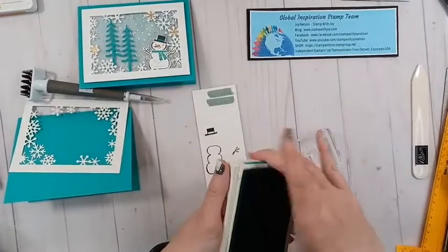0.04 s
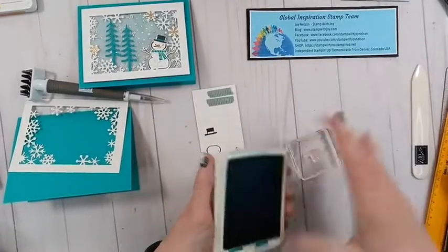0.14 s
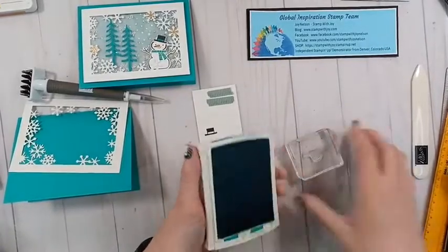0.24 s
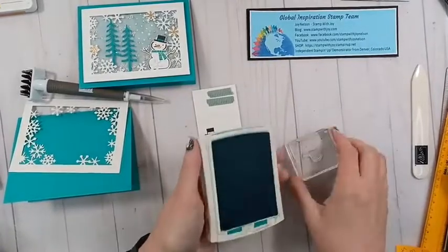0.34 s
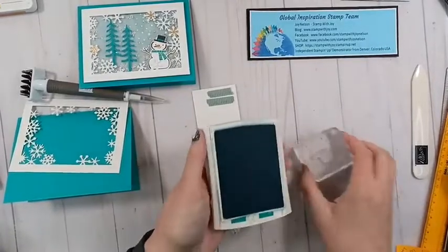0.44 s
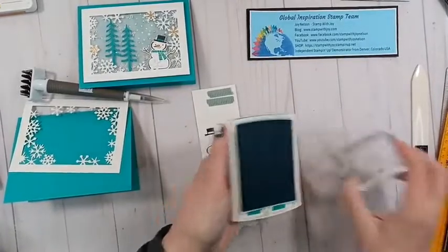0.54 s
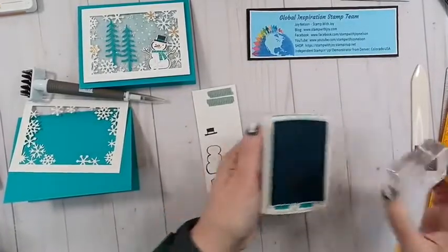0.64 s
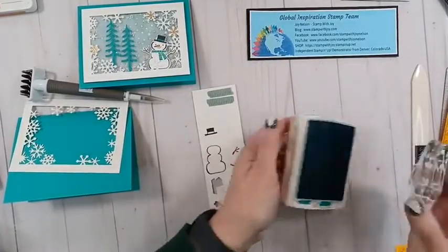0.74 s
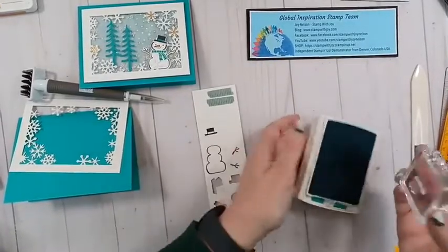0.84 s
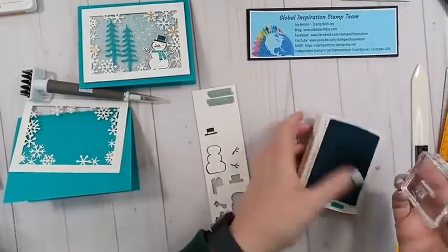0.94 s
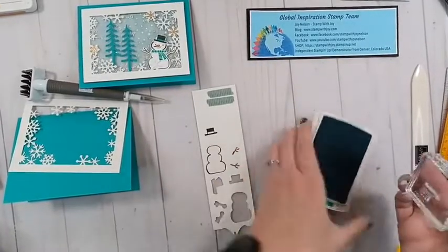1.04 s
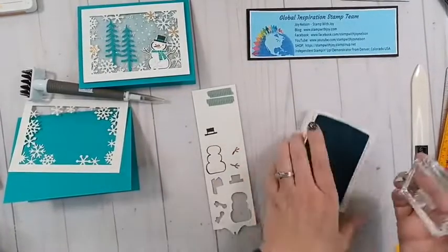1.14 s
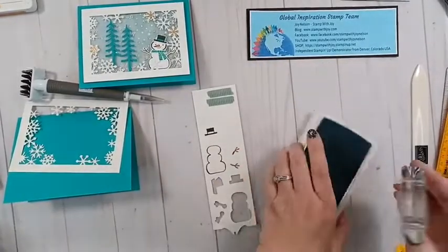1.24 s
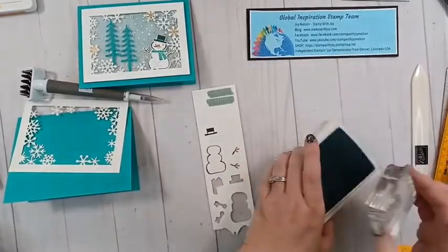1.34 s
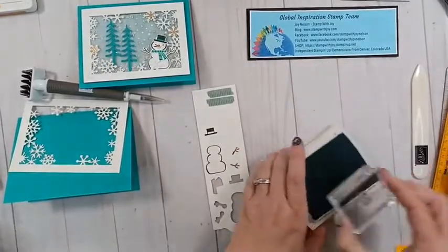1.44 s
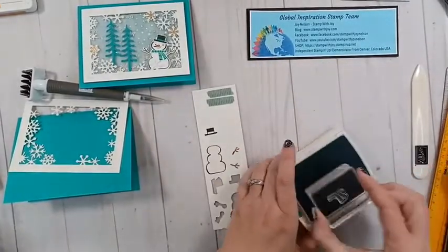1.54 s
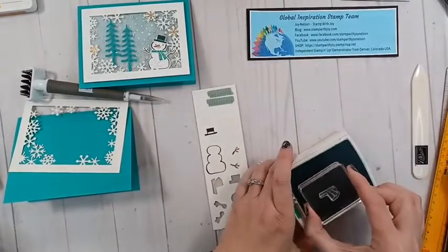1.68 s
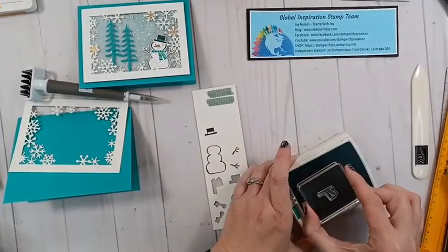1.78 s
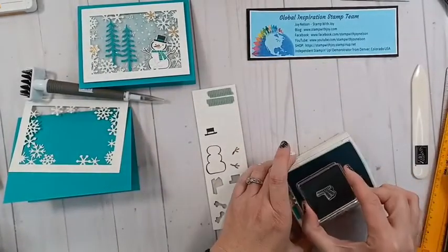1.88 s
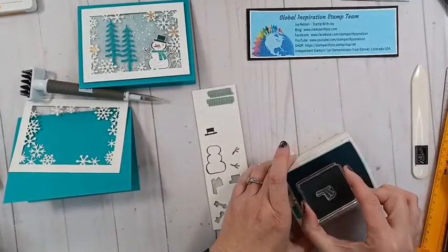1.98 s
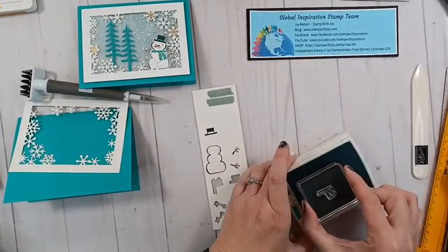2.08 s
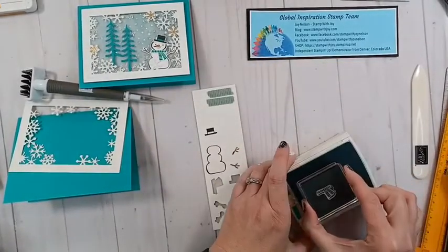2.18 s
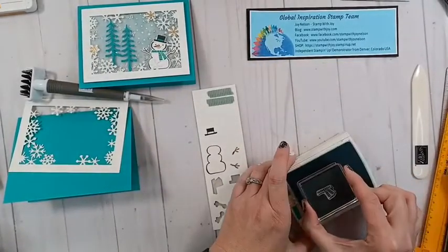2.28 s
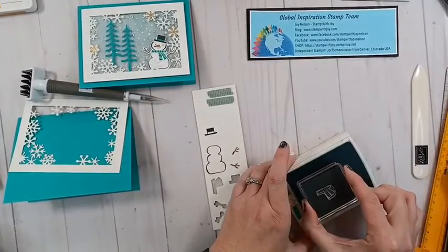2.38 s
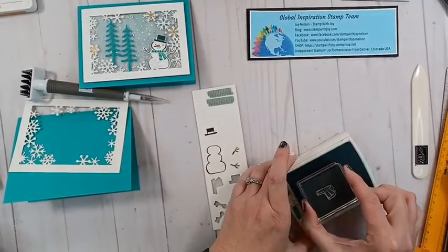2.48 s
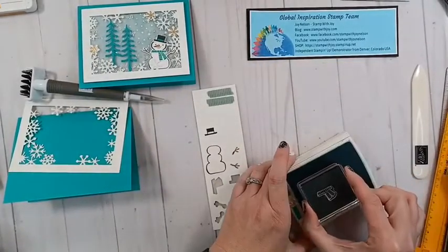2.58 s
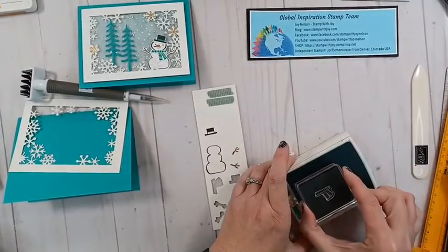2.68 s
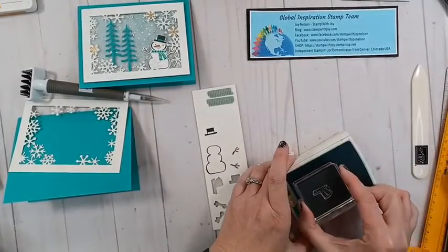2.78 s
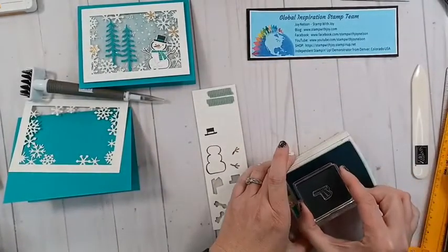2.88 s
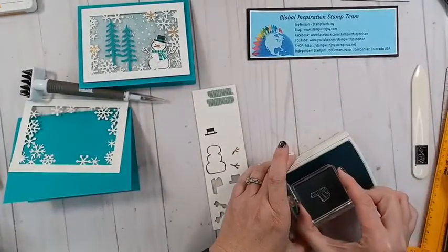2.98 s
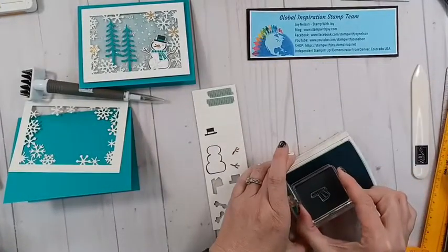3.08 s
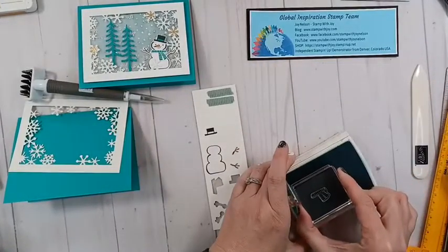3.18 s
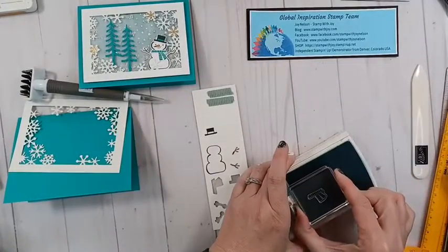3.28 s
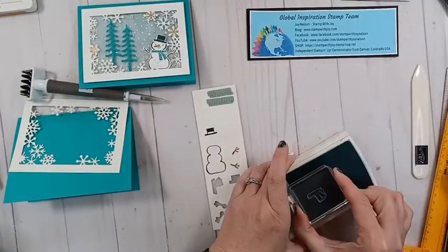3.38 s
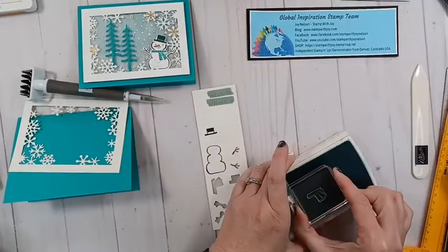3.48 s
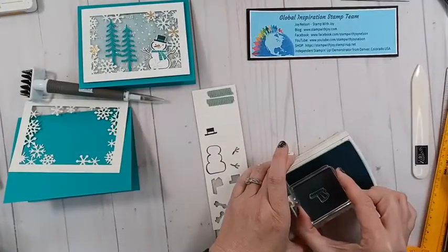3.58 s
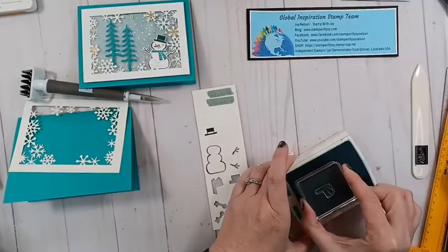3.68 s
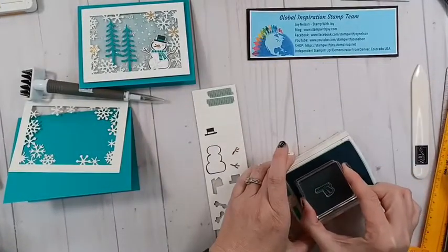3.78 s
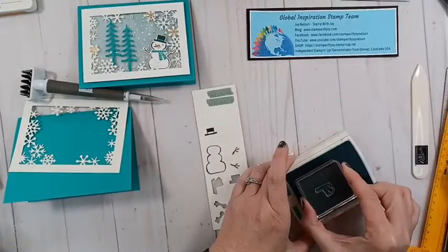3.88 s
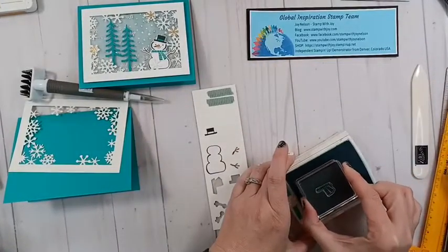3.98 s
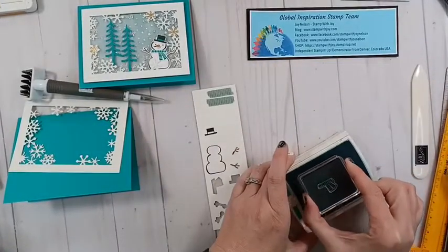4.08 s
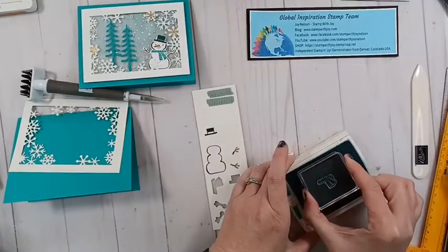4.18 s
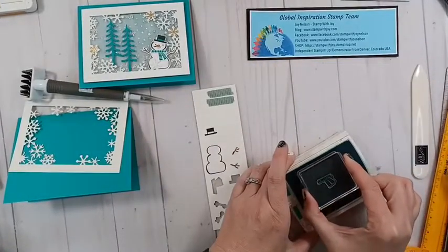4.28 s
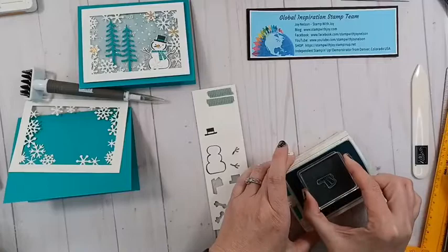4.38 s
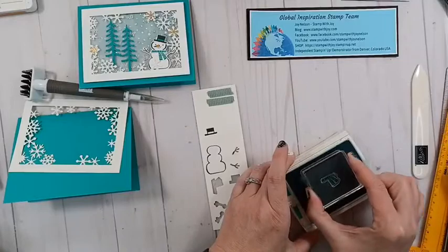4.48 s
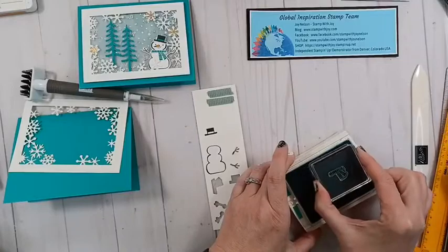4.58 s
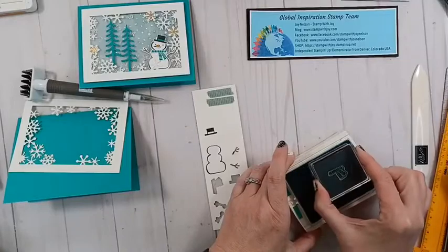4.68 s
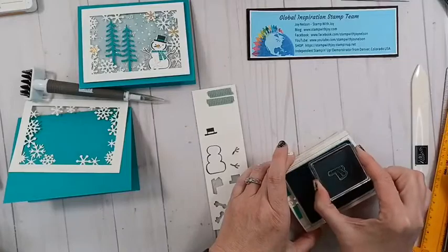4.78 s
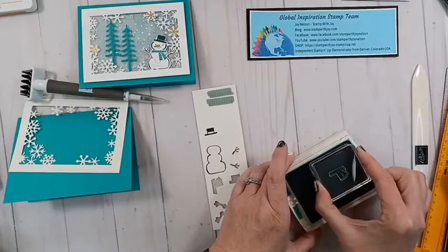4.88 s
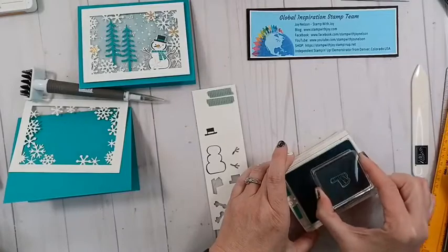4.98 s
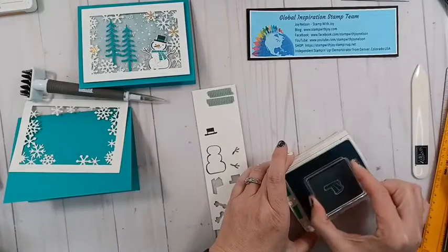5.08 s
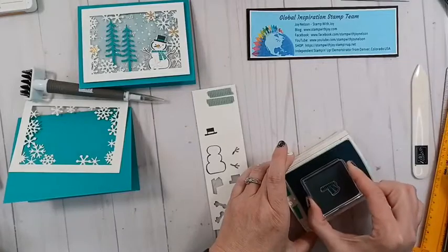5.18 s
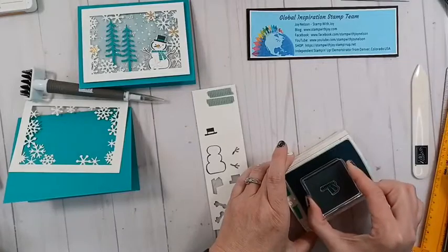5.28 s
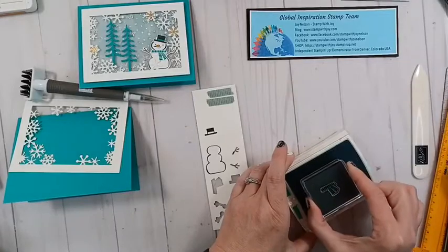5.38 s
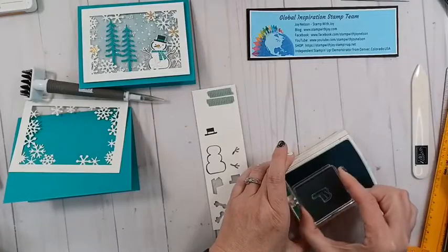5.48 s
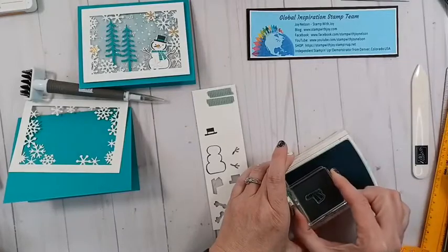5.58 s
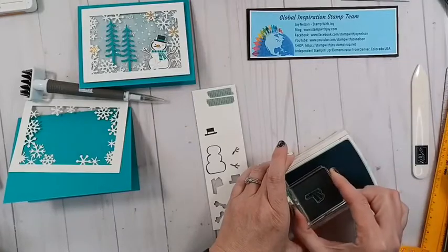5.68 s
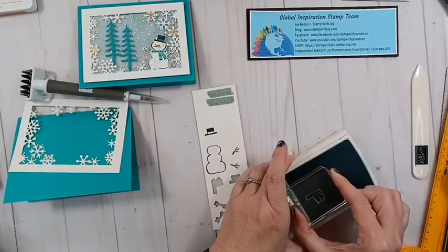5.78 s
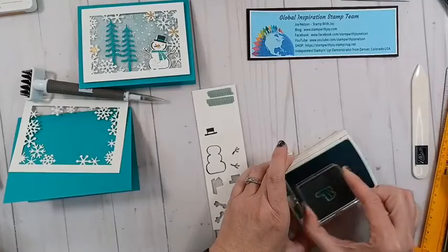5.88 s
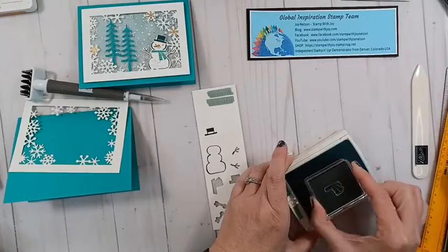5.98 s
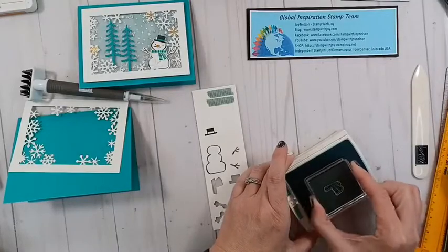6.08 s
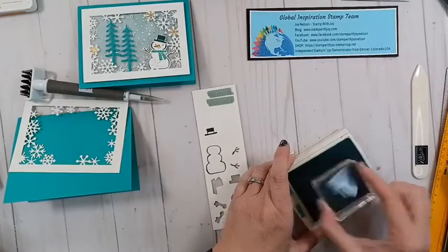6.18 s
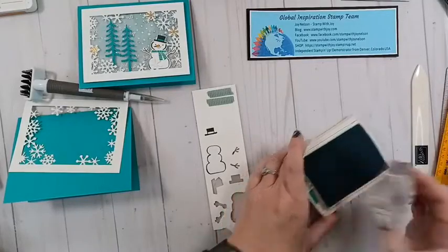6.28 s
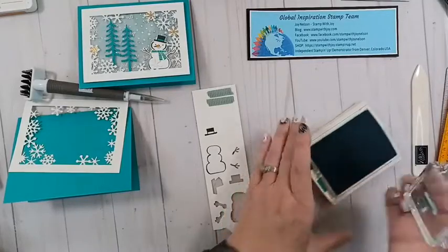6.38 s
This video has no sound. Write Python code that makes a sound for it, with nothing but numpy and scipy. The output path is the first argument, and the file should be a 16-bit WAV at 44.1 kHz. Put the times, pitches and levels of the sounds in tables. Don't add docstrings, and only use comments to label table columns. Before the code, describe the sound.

Close and dry in a quiet room: plastic squeaks and clatters, a pause, then soft irregular pops of a block on a foam pad, ending in a sharp tap and slide.

```python
import sys
import numpy as np
from scipy import signal
from scipy.fft import rfft, irfft, next_fast_len
from scipy.io import wavfile

SR = 44100
rng = np.random.default_rng(int(sys.argv[2]) if len(sys.argv) > 2 else 0)


def transcribe(signal):
    frames = np.atleast_2d(signal).T
    limited = np.clip(frames, -1, 1)
    pcm = np.round(limited * 32767).astype(np.int16)
    wavfile.write(sys.argv[1], SR, pcm)


def magnitude_from_level(level_db):
    exponent = np.asarray(level_db, float) / 20
    return 10 ** exponent


N = 283894

# time in seconds, pop level in dB, pop pitch in Hz,
# first touch in dB, edge crack in dB.
DABS = [
    (2.552, -45, 916, -62, -53),
    (2.8937, -39, 1050, -46.5, -58.5),
    (3.1996, -33.5, 1078, -52, -51.5),
    (3.5663, -39.5, 985, -43.5, -52),
    (3.9861, -35.5, 1036, -44.5, -57),
    (4.4649, -36.5, 1007, -37, -51),
    (4.9124, -26.5, 1000, -31, -45),
    (5.829, -44, 967, -44.5, -55),
    (6.1711, -22.5, 1050, -33, -37),
]
# time in seconds, pop level in dB, pop pitch in Hz,
# edge crack in dB, push on the table in dB.
PEELS = [
    (2.7405, -52, 1043, -60, -52),
    (2.9973, -58.5, 1075, -85, -62),
    (3.3098, -55.5, 1004, -68.5, -57),
    (3.7156, -54.5, 990, -61, -59),
    (4.1961, -55.5, 1003, -85, -75),
    (4.616, -47.5, 967, -60, -57),
    (5.1575, -52.5, 1140, -57.5, -61),
    (5.5957, -55.5, 923, -85, -75),
    (5.9988, -50.5, 1100, -56, -52.5),
]
# time in seconds, pop level in dB, pop pitch in Hz,
# edge crack in dB, brightness in dB.
LANDINGS = [(.0746, -50, 1300, -61, -6), (.093, -60, 1100, -62.5, 4), (.202, -85, 1000, -68, -2),
            (.3127, -85, 1000, -48.5, 1), (.338, -85, 1000, -56, -3), (.4138, -85, 1000, -52.5, -8),
            (.799, -25, 1080, -33, -1), (.8026, -23.5, 1080, -29, -2), (.8772, -24, 1110, -60, -5),
            (.873, -32, 1280, -39, -4), (1.1362, -34, 1239, -23.5, -5), (1.1387, -28, 1242, -27, -3),
            (1.1804, -26.5, 1140, -42.5, -8.5), (1.2026, -26.5, 980, -47, 3.5),
            (1.3528, -43, 957, -52.5, -4), (5.413, -32, 1008, -49, -60)]
# time in seconds, pop level in dB, pop pitch in Hz, edge crack in dB.
CHATTER = [(.0822, -55, 1120, -80), (.8175, -32, 1050, -60), (.8269, -33, 1300, -39),
           (.8301, -33, 1140, -60), (.851, -60, 1100, -43), (.865, -36, 1076, -60),
           (.8855, -28.5, 1020, -46), (.8927, -31, 965, -56), (.9031, -29.5, 1061, -57),
           (1.0307, -52, 1080, -80), (1.143, -25.5, 890, -50), (1.1474, -26, 1414, -50),
           (1.1536, -27, 1360, -50), (1.164, -32, 1240, -36), (1.1842, -28, 1200, -55),
           (1.189, -29, 1050, -40), (1.1937, -32, 1130, -40), (1.216, -32, 935, -44),
           (1.244, -60, 1000, -58), (2.5367, -54, 1020, -80), (2.5463, -48.5, 910, -70),
           (2.8757, -53, 1074, -80), (4.896, -39.5, 1090, -65), (3.1847, -46.5, 1080, -80),
           (4.4744, -46, 938, -80), (4.878, -85, 1000, -65), (5.3916, -42, 1102, -70),
           (5.3956, -41.5, 1063, -60), (5.4018, -41.5, 1000, -54)]
# frequency in Hz, level in dB, decay t60 in seconds.
CASE_MODES = [(887.7, -16, 0.083), (941.6, -11, 0.05), (1140, -22, 0.12), (1140, -18, 0.043),
              (1240, -23.5, 0.04), (1386, -24, 0.034), (649, -29, 0.049), (1500, -27.5, 0.061)]
# frequency in Hz, width in Hz, level in dB.
EDGE_MODES = [(1700, 380, -3), (2460, 400, 0.5), (3060, 400, -3.5), (3666, 230, -1.5), (4260, 400, -5),
              (5070, 410, -4), (5280, 1200, -10.5), (6970, 610, -11.5)]
# frequency in Hz, density in dB per Hz.
RATTLE = [(1100, -20.5), (1700, -2), (2500, 2), (3700, 2), (5000, -6), (7000, -14.5), (9000, -25)]
# time in seconds, peak in dB, swell in seconds,
# upper modes in dB.
PUSHES = [(.303, -48, .032, 5), (.345, -60, .02, 8), (.791, -36.5, .032, 2), (.815, -55, .02, 17),
          (.842, -38.5, .018, 5), (.866, -55, .012, 22), (.885, -33, .027, -8), (.915, -41, .025, -8),
          (1.088, -58, .02, 4), (1.128, -24, .022, 5), (1.158, -27, .027, -4), (1.188, -27.5, .027, -1.5),
          (1.215, -50, .02, 14), (1.27, -62, .02, 12), (1.347, -48, .024, -4), (5.4, -62, .025, 18),
          (6.167, -48.5, .027, 10), (6.19, -60, .02, 17)]
# time in seconds, peak in dB, frequency in Hz, swell in seconds.
KNOCKS = [
    (1.131, -26, 205, .007),
    (.795, -37, 200, .008),
    (.893, -36, 190, .006),
    (1.134, -26.5, 490, 0.0072),
    (1.145, -31, 380, .008),
    (1.178, -33, 430, 0.0048),
    (.872, -42, 480, .006),
    (6.168, -44, 400, 0.007),
]
# frequency in Hz, level in dB, decay t60 in seconds.
TABLE_MODES = [(94, -14.5, .11), (220.1, 2.5, 0.11), (308, -7, 0.096), (370, -5, .07), (482, -4, 0.023),
               (691, -4, 0.034)]
# frequency in Hz, density in dB per Hz.
THUD = [(150, -27), (230, 3.5), (350, -2.5), (490, -2.5), (680, -4.5), (900, -26.5)]
# frequency in Hz, level in dB.
BEND_MODES = [(133, -.5), (87, -5), (222, -8)]
# time in seconds, level in dB.
SHUFFLE = [(0, -61), (.04, -82), (.1, -63), (.16, -92), (.21, -80), (.27, -100)]
# time in seconds, level in dB.
LIFT = [(.298, -73.5), (.31, -45.5), (.337, -40.5), (.36, -45), (.38, -59), (.415, -68), (.45, -75),
        (.52, -92)]
# time in seconds, level in dB.
FIRST_DROP = [(.785, -80), (.8, -45), (.85, -40), (.9, -44), (.95, -62), (1.03, -59), (1.09, -61),
              (1.11, -73), (1.128, -75)]
# time in seconds, level in dB.
SECOND_DROP = [(1.138, -41), (1.2, -42), (1.25, -57), (1.3, -58), (1.37, -58), (1.42, -68), (1.5, -78),
               (1.7, -90)]
# time in seconds, level in dB.
SLIDE = [(6.175, -60), (6.22, -58.5), (6.27, -56.5), (6.33, -59.5), (6.39, -67), (6.44, -82)]
# block in dB, case in dB, skin in dB.
RUB_MIX = [
    (-6, -2.5, -12),
    (-.5, -20, -21),
    (-18, -.5, -19),
    (-12, -2.5, -15),
    (-1.5, -1.5, -13),
]
LIFT_SPAN = (.29, .6)
# frequency in Hz, width in Hz, level in dB.
SQUEAL = [(2600, 550, 0), (2900, 600, -2), (3600, 800, -9), (4800, 900, -12), (1900, 700, -14)]
# frequency in Hz, density in dB per Hz.
DRAG = [(1200, -22), (1800, -4), (2750, 1.5), (3600, -4.5), (4800, -3.5), (6000, -11), (8000, -25)]
# frequency in Hz, density in dB per Hz.
SKIN = [(2500, -34), (3700, -7.5), (4700, 0.5), (7000, 2.5), (8500, -5.5), (11000, -4), (13400, -3),
        (16000, -7.5)]
# time in seconds, peak in dB, fall in seconds.
SQUISH = [
    (2.27, -86, .08),
    (3.09, -77.5, .1),
    (4.06, -79, .08),
    (5.45, -71, .13),
]
# frequency in Hz, density in dB per Hz.
FOAM = [(900, -20), (1800, 0), (3000, -9), (4600, -3), (6000, -20)]
# time in seconds, level in dB.
SLEEVE = [(.34, -72), (.42, -72), (.5, -79), (.59, -79), (.625, -65), (.775, -61), (.8, -70), (1.0, -74),
          (1.12, -80)]
# time in seconds, level in dB.
SLEEVE_AWAY = [(6.19, -80), (6.25, -68), (6.31, -65), (6.37, -69), (6.44, -78)]
# frequency in Hz, density in dB per Hz.
CLOTH = [(2200, -25), (3800, -11), (4700, -2.5), (7500, -5), (9500, -4.5), (13000, 1), (16000, -3.5)]
# time in seconds, frequency in Hz, level in dB.
SCRAPE = [(.97, 1700, -84), (1.03, 2110, -70.5), (1.075, 2560, -60.5), (1.1, 2670, -60.5),
          (1.118, 2860, -84)]
# time in seconds, level in dB.
HUM = [(0, -68), (.28, -75), (.43, -61), (.56, -78), (1.3, -66), (1.47, -74), (1.53, -66), (2.33, -65),
       (2.39, -73), (2.77, -56), (2.86, -72), (3.2, -61), (3.68, -75), (3.8, -70), (4.16, -72), (4.27, -62),
       (4.37, -74), (5.7, -78)]
# frequency in Hz, level in dB.
WHINE = (626, -83.5)
# frequency in Hz, density in dB per Hz.
AIR = [(25, -13.5), (60, -8), (95, 3.5), (160, -3.5), (300, -12), (450, -20), (1000, -21), (2000, -25),
       (4000, -32.5), (8000, -34.5), (13000, -35), (16500, -37)]
# frequency in Hz, t60 in seconds.
ROOM = [(100, 0.36), (1000, 0.2), (5000, .25), (15000, 0.05)]


def rms_one(x):
    return x / np.sqrt(np.mean(x ** 2) + 1e-20)


def in_time(rows, outside=None):
    s, *columns = np.transpose(rows)
    t = np.arange(N) / SR
    return [np.interp(t, s, column, outside, outside) for column in columns]


def stroke_gain(rows):
    return magnitude_from_level(in_time(rows, outside=-150)[0])


def at_hz(points, hz):
    table_hz, values = np.array(points).T
    return np.interp(np.log(hz + 1), np.log(table_hz), values)


def coloured(spectrum):
    hz = np.arange(N // 2 + 1) * SR / N
    white = rfft(rng.standard_normal(N))
    return rms_one(irfft(white * magnitude_from_level(at_hz(spectrum, hz)), N))


def drift(rate):
    r = np.exp(-2 * np.pi * rate / SR)
    return rms_one(signal.lfilter([1], [1, -2 * r, r * r], rng.standard_normal(N + SR))[SR:])


def ring(force, hz, t60):
    r = magnitude_from_level(-60 / (t60 * SR))
    w = 2 * np.pi * hz / SR
    return signal.lfilter([0, np.sin(w)], [1, -2 * r * np.cos(w), r * r], force + 1e-18)


def narrow(force, hz, width):
    t60 = np.log(1000) / np.pi / width
    return rms_one(ring(ring(force, hz, t60), hz, t60))


def dying(times, levels_db, t60):
    blows = np.zeros(N) + 1e-18
    blows[(times * SR).astype(int)] = magnitude_from_level(levels_db)
    decay = signal.lfilter([1], [1, -magnitude_from_level(-60 / (t60 * SR))], blows)
    return signal.lfilter([.02], [1, -.98], decay)


def strike(times, levels_db, modes, spread_db, contact_s):
    at = (np.array(times) * SR).astype(int)
    out = np.zeros(N)
    luck = rng.standard_normal((len(at), len(modes), 2))
    for k, (hz, level_db, t60) in enumerate(modes):
        force = np.zeros(N)
        force[at] = magnitude_from_level(levels_db + level_db + spread_db * luck[:, k, 0]) * np.sign(luck[:, k, 1])
        out += ring(force, hz, t60)
    contact = np.hanning(contact_s * SR + 3)
    return np.convolve(out, contact / contact.sum())[:N]


def add_swell(out, start_s, peak_db, hz, rise_s, order):
    t = np.arange(int(8 * rise_s * SR)) / SR / rise_s
    swell = magnitude_from_level(peak_db) * (t * np.exp(1 - t)) ** order
    at = int(start_s * SR)
    out[at:at + len(t)] += (swell * np.sin(2 * np.pi * hz * rise_s * t))[:N - at]


def contacts():
    pop, edge = [], []
    for s, db, hz, touch_db, edge_db in DABS:
        touch_s, touch_hz = s - .0102, hz * 1.05
        graze_s = s - .0058
        pop += [(s, db, hz), (touch_s, touch_db, touch_hz), (graze_s, touch_db - 8, touch_hz)]
        edge += [(s, edge_db, -8.5), (touch_s, touch_db - 21, -15)]
    for s, db, hz, edge_db, _ in PEELS:
        pop += [(s, db, hz), (s + .004, db - 5, hz * .96)]
        edge += [(s, edge_db, -5)]
    dull_chatter = [(*row, -15) for row in CHATTER]
    for s, db, hz, edge_db, bright_db in LANDINGS + dull_chatter:
        pop += [(s, db, hz)]
        edge += [(s, edge_db, bright_db)]
    return pop, np.array(edge) - [.0022, 0, 0]


def pops():
    out = np.zeros(N)
    rise_s, lead_s = .0025, .006
    pop, _ = contacts()
    for s, peak_db, hz in pop:
        add_swell(out, s - rise_s, peak_db, hz, rise_s, order=3)
        add_swell(out, s - 2 * lead_s, peak_db - 27, hz, lead_s, order=2)
    s, peak_db, _ = np.transpose(pop)
    return out + strike(s, peak_db, CASE_MODES, spread_db=4.0, contact_s=0.00033)


def cracks():
    s, peak_db, bright_db = np.transpose(contacts()[1])
    start = s - .0015
    luck = rng.standard_normal((len(s), len(EDGE_MODES)))
    grit = magnitude_from_level(2.5 * drift(280))
    bright = dying(start, peak_db + bright_db, 0.011)
    bright += dying(start, peak_db + bright_db - 13, .1)
    out = bright * coloured(SKIN)
    out += dying(start, peak_db - 14, 0.13) * coloured(RATTLE) * grit
    grains = grit * rng.standard_normal(N)
    for k, (hz, width, level_db) in enumerate(EDGE_MODES):
        burst = dying(start, peak_db + level_db - 7.0 + 3.0 * luck[:, k], 0.022)
        out += burst * narrow(grains, hz, width)
    return out


def rubs():
    t = np.arange(N) / SR
    grains = rng.standard_normal(N) * magnitude_from_level(3.0 * drift(140))
    squeal = rms_one(sum(magnitude_from_level(level_db) * narrow(grains, hz, width) for hz, width, level_db in SQUEAL))
    sliding = coloured(DRAG) * magnitude_from_level(3.0 * drift(100))
    block = np.where((t > LIFT_SPAN[0]) & (t < LIFT_SPAN[1]), squeal, sliding)
    case = np.zeros(N)
    for k, (hz, level_db, t60) in enumerate(CASE_MODES):
        case += magnitude_from_level(level_db) * ring(grains, hz, .15 * t60) * (-1) ** k
    case = rms_one(case)
    skin = coloured(SKIN) * magnitude_from_level(1.5 * drift(60))

    creep = [[(s - .12, db - 22), (s, db), (s + fall_s, db - 22)] for s, db, fall_s in SQUISH]
    out = sum(stroke_gain(rows) for rows in creep) * coloured(FOAM)
    cloth = coloured(CLOTH) * magnitude_from_level(1.3 * drift(60))
    out += (stroke_gain(SLEEVE) + stroke_gain(SLEEVE_AWAY)) * cloth
    strokes = [SHUFFLE, LIFT, FIRST_DROP, SECOND_DROP, SLIDE]
    for stroke, (block_db, case_db, skin_db) in zip(strokes, RUB_MIX):
        rubbed = magnitude_from_level(block_db) * block + magnitude_from_level(case_db) * case + magnitude_from_level(skin_db) * skin
        out += stroke_gain(stroke) * rubbed
    return out


def scrape():
    hz, level_db = in_time(SCRAPE)
    tone = np.cos(2 * np.pi * np.cumsum(hz) / SR)
    return magnitude_from_level(level_db) * drift(160) * tone * (level_db > -84)


def pushes():
    mean_db = np.mean([row[1] for row in DABS])
    taps = [(s, -63, 10 + .8 * (db - mean_db)) for s, db, *_ in DABS[:-1]]
    taps += [(s, push_db, 1.5) for s, *_, push_db in PEELS]
    return PUSHES + [(s - .009, db, .028, upper_db) for s, db, upper_db in taps]


def thumps():
    out = np.zeros(N)
    for s, peak_db, hz, swell_s in KNOCKS:
        add_swell(out, s, peak_db, hz, swell_s, order=1)
    s, peak_db, _, upper_db = np.transpose(pushes())
    level_db = peak_db + upper_db
    out += dying(s + 0.0055, level_db - 12.0, 0.069) * coloured(THUD)
    return out + strike(s + .005, level_db - 8.0, TABLE_MODES, spread_db=3.5, contact_s=0.0013)


def bends():
    out = np.zeros(N)
    for s, peak_db, swell_s, _ in pushes():
        for hz, level_db in BEND_MODES:
            add_swell(out, s, peak_db + level_db, hz, swell_s, order=3)
    return out


def room(x):
    size = next_fast_len(N + SR)
    hz = np.arange(size // 2 + 1) * SR / size
    echoes = 0
    for k, lag_s in enumerate(rng.uniform(.007, 0.033, 10)):
        loop = magnitude_from_level(-60 * lag_s / at_hz(ROOM, hz)) * np.exp(-2j * np.pi * hz * lag_s)
        echoes = echoes + (-1) ** k * loop / (1 - loop)
    return irfft(rfft(x, size) * echoes, size)[:N]


def wavering_tone(hz, level_db):
    return np.sqrt(2) * magnitude_from_level(level_db) * np.sin(2 * np.pi * np.cumsum(hz) / SR)


def background():
    hum_db, = in_time(HUM)
    hum = wavering_tone(225.2 + 3.0 * drift(8.8), hum_db + 2.2 * drift(4) + 1.5 * drift(10))
    whine_hz, whine_db = WHINE
    whine = wavering_tone(whine_hz + .8 * drift(4), whine_db + 1.5 * drift(13))
    return hum + whine + magnitude_from_level(-73.5) * coloured(AIR)


def scene():
    desk = pops() + cracks() + thumps() + rubs() + scrape()
    bend = bends()
    mid = desk + magnitude_from_level(-20) * room(desk) + bend + background()
    side = magnitude_from_level(-44) * room(desk + .3 * bend)
    side += magnitude_from_level(-22.5) * np.gradient(mid)
    side += magnitude_from_level(-100) * coloured(SKIN)
    return np.array([mid + side, mid - side])


def roll_off(x):
    return signal.sosfilt(signal.butter(12, 16000, fs=SR, output="sos"), x)


def record(dry):
    thin = signal.sosfilt(signal.butter(3, 62, "high", fs=SR, output="sos"), dry)
    mix = signal.sosfilt(signal.cheby2(12, 70, 16700, fs=SR, output="sos"), thin)
    return roll_off(mix)


dry = scene()
out = record(dry)
transcribe(out)
```